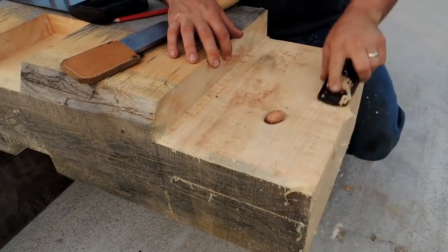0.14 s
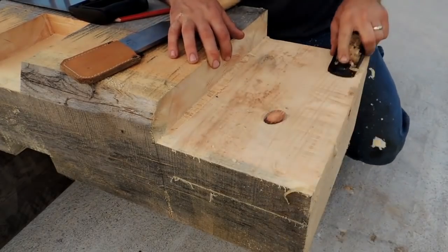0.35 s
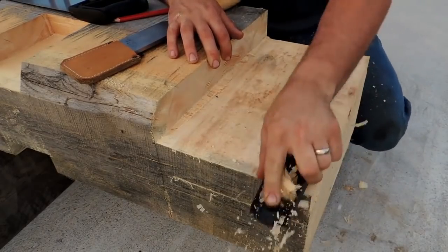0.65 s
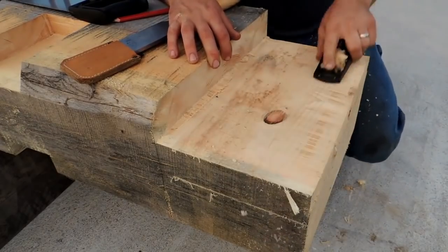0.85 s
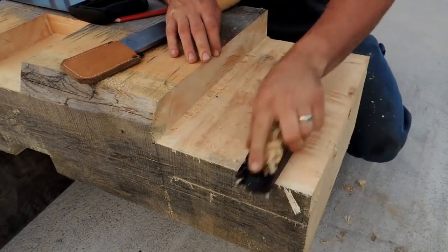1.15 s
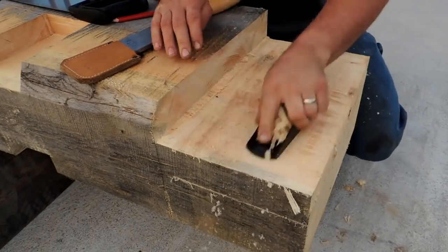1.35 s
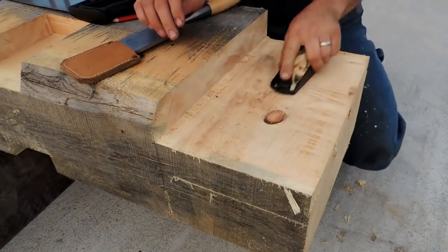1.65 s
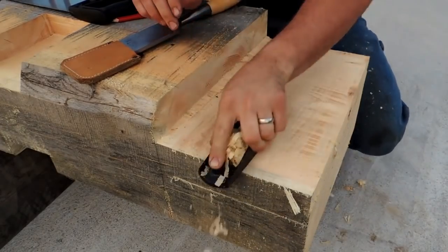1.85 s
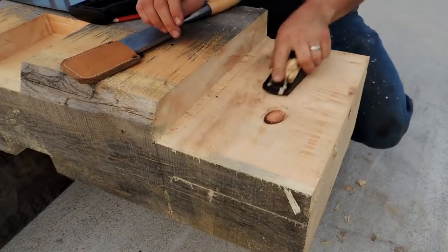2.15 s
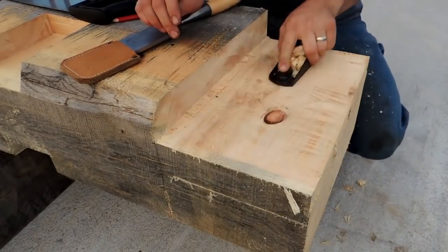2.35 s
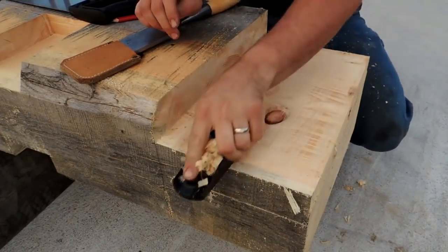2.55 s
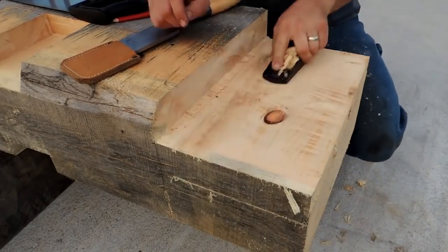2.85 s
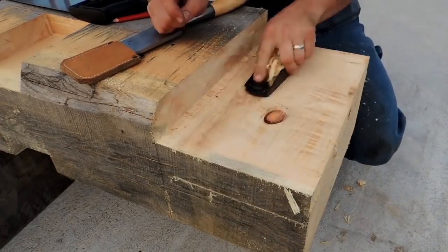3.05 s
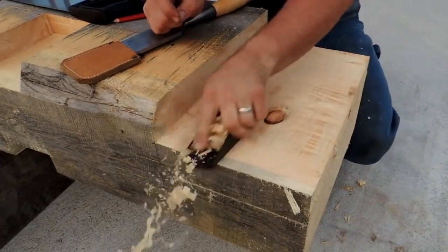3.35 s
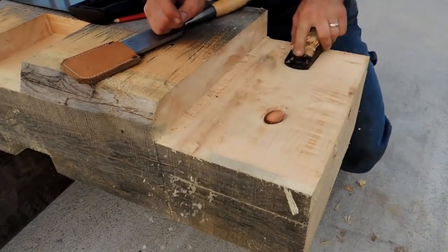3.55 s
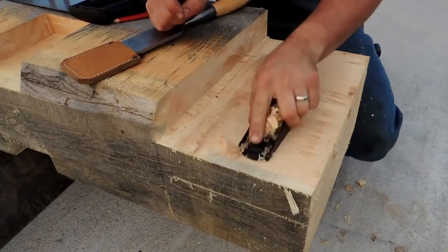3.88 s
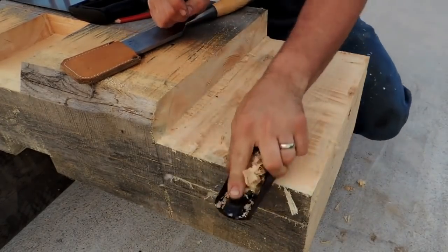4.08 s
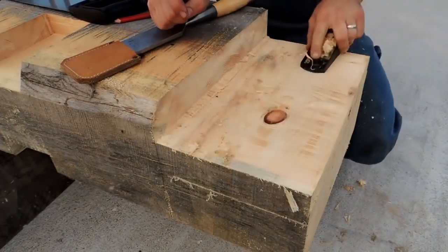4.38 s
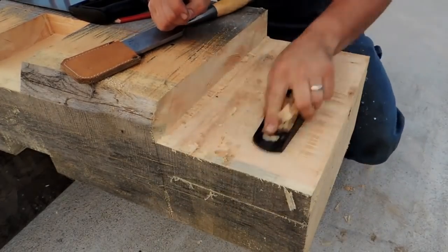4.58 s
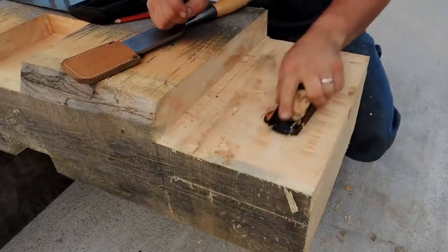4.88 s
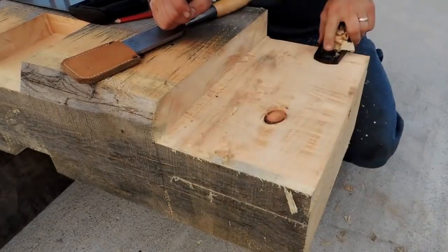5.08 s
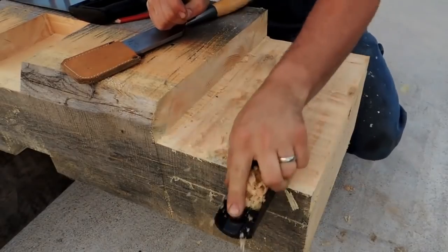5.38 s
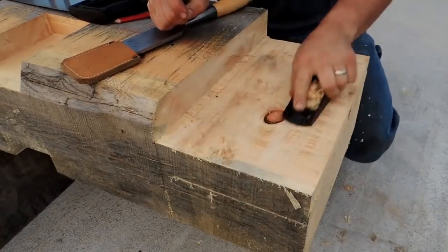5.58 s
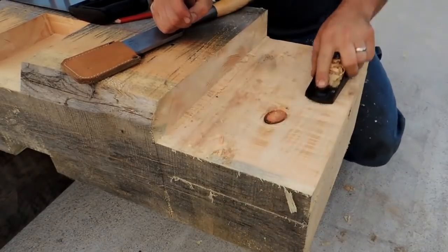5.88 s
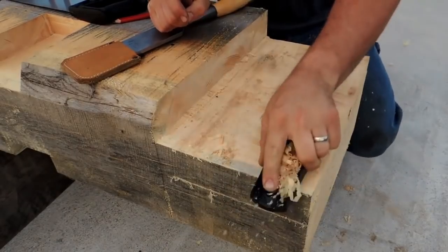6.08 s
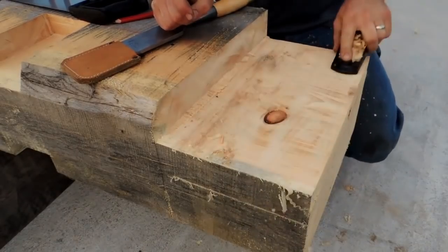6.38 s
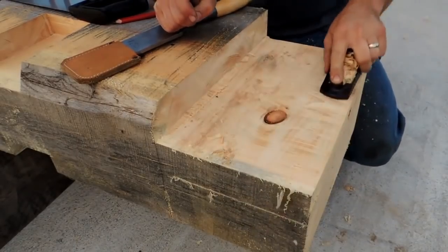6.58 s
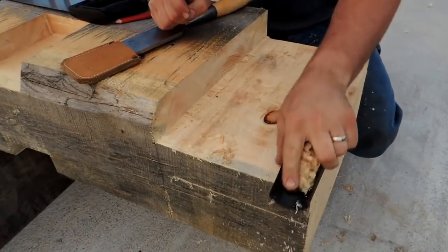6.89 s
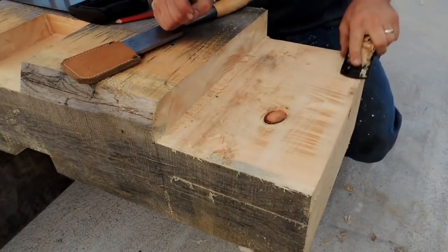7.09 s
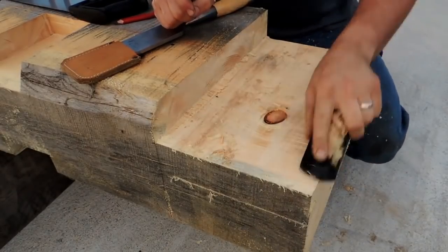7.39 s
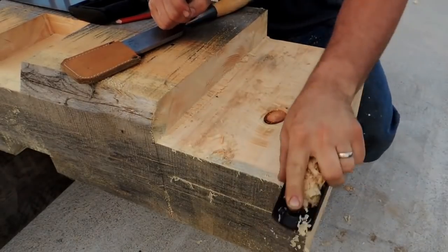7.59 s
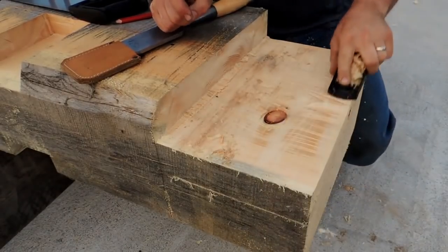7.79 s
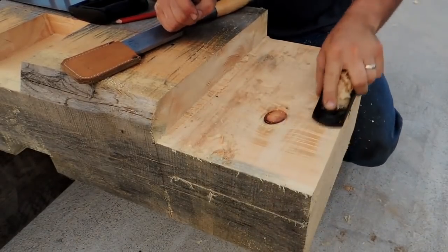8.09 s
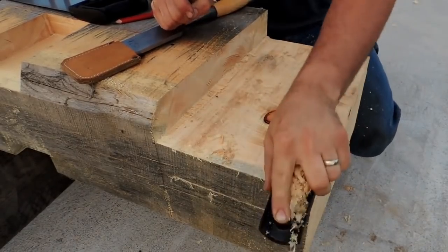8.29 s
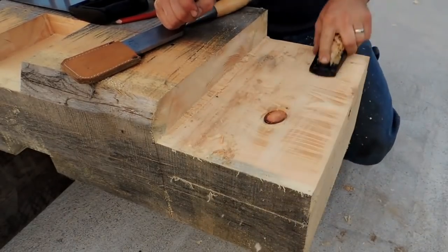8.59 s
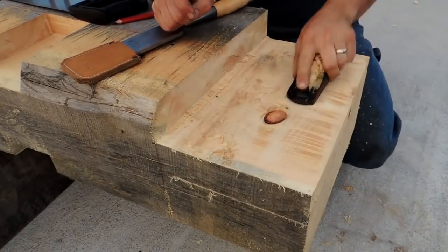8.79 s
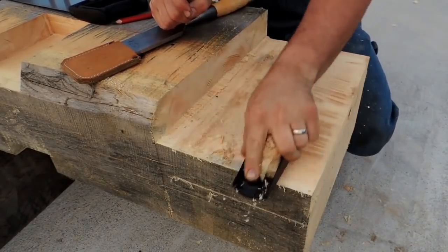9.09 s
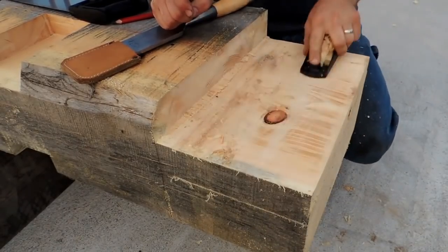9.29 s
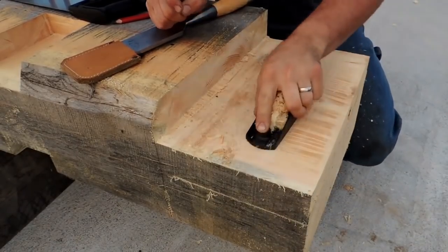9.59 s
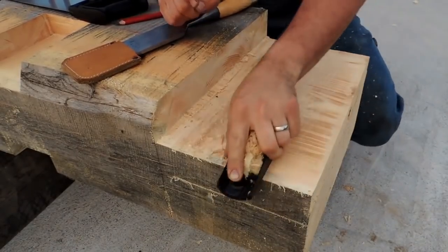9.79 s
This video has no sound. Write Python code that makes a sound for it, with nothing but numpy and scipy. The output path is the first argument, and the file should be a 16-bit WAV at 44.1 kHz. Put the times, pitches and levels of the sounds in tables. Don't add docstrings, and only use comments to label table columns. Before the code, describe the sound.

A small block plane rasps back and forth over a heavy timber in quick scraping strokes, with wooden knocks and soft low wind thumps.

```python
import sys
import numpy as np
from scipy import signal
from scipy.fft import rfft, irfft, next_fast_len
from scipy.io import wavfile
from scipy.ndimage import uniform_filter1d, map_coordinates

SR = 44100
rng = np.random.default_rng(int(sys.argv[2]) if len(sys.argv) > 2 else 0)


def dump(signal):
    limited = np.clip(np.atleast_2d(signal).T, -1, 1)
    pcm = np.round(limited * 32767).astype(np.int16)
    wavfile.write(sys.argv[1], SR, pcm)


def nominal_scale(level):
    x = np.asarray(level, float) / 20
    return 10 ** x


N = 438354


def unit(x):
    return x / np.sqrt(np.mean(x ** 2) + 1e-20)


def curves(rows):
    s, *columns = np.transpose(rows)
    s = np.maximum.accumulate(s)
    return [np.interp(np.arange(N) / SR, s, column) for column in columns]


def wobble(rate):
    knots = rng.standard_normal(int(N * rate / SR) + 4)
    return map_coordinates(knots, [np.arange(N) * rate / SR])


def filtered(x, response):
    m = next_fast_len(N + SR // 2)
    spectrum = rfft(x, m) * response(np.fft.rfftfreq(m, 1 / SR))
    return irfft(spectrum, m)[:N]


def coloured(x, points):
    hz, db = np.transpose(points)
    return filtered(x, lambda f: nominal_scale(np.interp(np.log(f + 1), np.log(hz), db)))


def ringing(force, modes, shift_db, steep):
    total = np.zeros(N)
    for k, (hz, width, db) in enumerate(modes):
        b, a = signal.iirpeak(hz, hz / width, SR)
        drive = force * nominal_scale(shift_db * wobble(9))
        total += (-1) ** k * nominal_scale(db) * signal.lfilter(b, a, drive)
    top = modes[-1][0] * 1.177
    return filtered(total, lambda f: 1 / (1 + 1j * f / top) ** steep) * nominal_scale(2.97 * steep)


def patchy(x, depth_db):
    z = signal.stft(x, nperseg=512)[2]
    field = uniform_filter1d(rng.standard_normal(z.shape), 3, 0)
    field = uniform_filter1d(field, 14, 1)
    return signal.istft(z * nominal_scale(depth_db * unit(field)), nperseg=512)[1][:N]


def tearing(per_second, spread_db, rub):
    sizes = nominal_scale(spread_db * np.clip(rng.standard_normal(N), -2, 2))
    snaps = (rng.random(N) < per_second / SR) * sizes
    snaps = unit(snaps * rng.choice([-1, 1], N))
    return unit(snaps + rub * rng.standard_normal(N))


def yard():
    # (frequency [Hz], density [dB per Hz])
    yard_spectrum = [(88, -41), (150, 2), (341, 9.5), (457, -18.5), (1140, -2.5), (1260, -22.5),
                     (7470, -13), (16000, -20)]
    return nominal_scale(-70) * unit(coloured(rng.standard_normal(N), yard_spectrum))


def wind():
    # (time [s], level [dB])
    breeze_levels = [(0.0, -75), (0.33, -74), (0.58, -79), (0.8, -69), (0.97, -75), (1.55, -61),
                     (1.71, -70.5), (2.96, -80), (3.07, -67), (3.21, -42), (3.35, -58), (3.63, -63),
                     (3.84, -58), (3.98, -60), (4.4, -57.5), (4.76, -48), (5.04, -38), (5.26, -62),
                     (5.48, -64), (5.67, -54), (5.98, -58), (6.12, -48), (6.2, -44), (6.37, -66),
                     (7.5, -68.5), (7.61, -43), (7.75, -40.5), (7.8, -41), (7.94, -47.5), (8.22, -52),
                     (8.39, -38), (8.5, -45), (8.61, -46), (8.72, -58), (9.08, -47), (9.3, -67),
                     (9.66, -53.5), (9.94, -70)]
    # (time [s], level [dB], length [ms], signed direction [ratio])
    puff_events = [(1.448, -22, 3.7, 1), (1.46, -28, 1.1, 0.61), (1.468, -17, 1, -1.4),
                   (2.241, -18, 0.96, 1), (3.095, -26, 2.8, 0.81), (3.121, -16.5, 1.2, 0.65),
                   (3.462, -31, 0.7, 1), (4.528, -29, 1.7, 1), (4.537, -18, 2, 1),
                   (4.779, -16.5, 2.6, 0.79), (4.923, -16, 6.1, -1), (4.934, -15.5, 4, 0.65),
                   (4.955, -17.5, 4, 1), (5.142, -17.5, 1.4, 1), (5.551, -32, 2.5, 0.89),
                   (6.169, -37, 3.4, 1), (7.639, -21, 2.3, -1), (7.648, -13, 3.6, 0.94),
                   (7.788, -30, 2.4, 1), (7.851, -19, 1.4, 0.92), (7.868, -24, 3, 0.61),
                   (8.391, -24.5, 2.7, 1), (8.67, -30, 4.3, 0.77), (9.232, -39, 4.4, 0.77),
                   (9.472, -29.5, 5, 0.9)]
    push = np.zeros(N + SR)
    t = np.arange(SR // 20) / SR
    for s, db, ms, way in puff_events:
        u = t / (ms / 1000)
        push[round(s * SR):][:len(t)] += way * nominal_scale(db + 17) * u ** 1.74 * np.exp(-u * 1.52)

    def bass(f):
        return -f * f / (54 ** 2 - f * f + 1j * f * 22)

    lumps = nominal_scale(5 * wobble(15)) * rng.standard_normal(N)
    breeze = unit(filtered(lumps, lambda f: bass(f) / (1 + (f / 60) ** 1.66)))
    return filtered(push[:N], bass) + nominal_scale(curves(breeze_levels)[0] + 6) * breeze


def rasps():
    # (time [s], level [dB], half-length [s])
    rasp_events = [
        (0.729, -27, 0.0093),
        (1.349, -32, 0.015),
        (1.904, -60.5, .012),
        (4.173, -39, .016),
        (4.835, -31, 0.0066),
        (5.519, -32.5, 0.0097),
        (7.619, -36, .012),
        (7.805, -38, 0.01),
        (9.117, -33.5, .012),
    ]
    # (frequency [Hz], density [dB per Hz])
    splinter_spectrum = [(3000, -40), (4200, -4), (5200, 4), (7000, -3), (9000, -25), (15000, -27.5)]
    t = np.arange(N) / SR
    swell = sum(nominal_scale(db) * np.exp(-((t - s) / length) ** 4) for s, db, length in rasp_events)
    return swell * unit(coloured(tearing(per_second=4400, spread_db=5, rub=1.2), splinter_spectrum))


def plane():
    # (time [s], timber [dB], iron body [dB], blade [dB], shaving hiss [dB])
    early_strokes = [
        [(0.0, -30, -29.5, -41, -48), (0.114, -28, -29.5, -36.5, -41.5), (0.146, -46, -70, -63, -74),
         (0.174, -58, -63, -70, -70.5), (0.216, -27, -34, -50, -53), (0.36, -24, -22.5, -29, -33.5),
         (0.462, -49, -59, -67, -74), (0.494, -36, -33.5, -60, -57), (0.546, -36, -26, -35, -43),
         (0.74, -29.5, -29.5, -36.5, -40), (0.758, -49, -58, -60, -65), (0.848, -66, -68, -73, -70.5),
         (0.86, -34, -33, -44, -40)],
        [(0.86, -26, -31.5, -38.5, -48.5), (1.016, -23, -26, -36, -39.5), (1.066, -30.5, -32.5, -41, -53),
         (1.106, -39.5, -51, -71, -73.5), (1.192, -38.5, -28.5, -34.5, -41), (1.312, -41.5, -41.5, -43, -43),
         (1.352, -35.5, -27.5, -39.5, -47.5), (1.416, -59, -79, -67, -73), (1.474, -47, -66, -69, -69),
         (1.488, -56, -58, -55, -57)],
        [(1.488, -44, -42, -40, -48.5), (1.526, -34.5, -43, -55, -54.5), (1.552, -34, -35, -57, -57),
         (1.558, -35, -36, -46, -42.5)],
        [(1.558, -34.5, -34, -45, -40), (1.668, -40, -44, -48.5, -59.5), (1.72, -70, -76, -76, -83),
         (1.768, -65, -58, -77, -79), (1.804, -58, -47, -55, -60), (1.872, -51, -47, -59, -59),
         (1.884, -47, -40, -49, -35)],
        [(1.884, -52, -33, -47, -23.5), (1.936, -37, -33.5, -48.5, -50.5), (2.038, -44.5, -49.5, -63.5, -57),
         (2.07, -69.5, -73.5, -89, -75.5), (2.166, -77.5, -84, -88, -86), (2.22, -43, -57, -90, -65),
         (2.258, -45.5, -40.5, -57, -44), (2.378, -37, -43, -57, -56), (2.426, -62, -74, -84, -87),
         (2.53, -45.5, -44, -57, -59.5), (2.602, -50, -48, -66, -57), (2.618, -37.5, -39, -52, -48)],
        [(2.618, -42.5, -32.5, -50, -51.5), (2.712, -29, -28.5, -37, -42), (2.73, -46, -52, -59, -64),
         (2.776, -62, -68, -69, -69), (2.846, -72, -75, -78, -80), (2.858, -53, -55, -48, -55)],
        [(2.858, -41, -45, -59, -59), (2.906, -34.5, -35, -52, -43), (3.03, -54, -50, -88, -69),
         (3.102, -63, -66, -86, -81), (3.21, -39.5, -38.5, -77, -60), (3.256, -42, -38.5, -54, -49.5),
         (3.36, -33.5, -24.5, -49, -53), (3.372, -46, -49, -65, -61), (3.448, -73, -76, -77, -75),
         (3.456, -32, -50, -86, -84)],
        [(3.456, -35, -59, -86, -75), (3.486, -31.5, -74, -85, -69), (3.52, -49, -62, -86, -69),
         (3.527, -39, -40, -62, -53)],
        [(3.527, -36, -36, -67, -52), (3.727, -54.5, -52.5, -62, -71.5), (3.781, -58, -71, -81, -87),
         (3.863, -46.5, -40.5, -50, -58), (3.927, -45, -47, -56, -56.5), (3.971, -36, -25, -27.5, -31),
         (4.031, -42, -42, -51, -57.5), (4.127, -34.5, -40, -60, -49), (4.173, -26.5, -34, -49, -47.5),
         (4.211, -50, -61, -65, -64), (4.311, -74, -88, -86, -90), (4.327, -62, -57, -44, -54)],
        [(4.327, -49.5, -51, -64, -61), (4.381, -36, -43, -55, -43.5), (4.439, -55, -52, -66, -61),
         (4.615, -49, -58, -67, -69.5), (4.689, -36, -38, -44, -51.5), (4.769, -47, -43.5, -69, -53.5),
         (4.827, -30, -31, -33.5, -44.5), (4.893, -65, -65, -77, -68), (4.919, -42, -77, -69, -69),
         (4.973, -65, -76, -77, -64), (4.99, -58, -58, -57, -60)],
    ]
    # (time [s], timber [dB], iron body [dB], blade [dB], shaving hiss [dB])
    late_strokes = [
        [(4.99, -52, -43, -47, -46), (5.014, -30.5, -42.5, -66, -50), (5.16, -36.5, -39.5, -38.5, -44.5),
         (5.214, -41, -36.5, -52, -63), (5.248, -51, -57, -73, -76), (5.348, -38.5, -33.5, -41.5, -45),
         (5.528, -37, -32.5, -46.5, -46), (5.542, -48, -56, -59, -65), (5.654, -75, -80, -85, -82),
         (5.666, -29, -47, -58, -57)],
        [(5.666, -43, -39.5, -45, -47), (5.74, -27.5, -35.5, -60, -50), (5.836, -29, -30.5, -39.5, -45.5),
         (5.958, -47.5, -44, -68, -72), (6.024, -36, -31, -41.5, -43), (6.222, -25, -28, -35.5, -38.5),
         (6.278, -50.5, -68, -67, -72), (6.398, -43, -51, -74, -58), (6.416, -34.5, -41, -58, -52),
         (6.462, -59, -64, -68, -65), (6.492, -36, -32, -40, -46)],
        [(6.492, -30, -38, -44, -48), (6.512, -25.5, -21.5, -28.5, -33), (6.592, -31, -33, -44.5, -55),
         (6.628, -34.5, -56, -64, -69), (6.676, -36, -28.5, -58, -58), (6.738, -31.5, -22, -32.5, -36),
         (6.938, -31, -34, -39.5, -45), (6.998, -56, -76, -78, -77), (7.066, -61, -67, -72, -64)],
        [(7.066, -47, -59, -59, -59), (7.07, -44, -50, -51, -54), (7.086, -49, -71, -76, -71),
         (7.098, -40, -51, -61, -59)],
        [(7.098, -28, -51, -59, -59), (7.1, -27.5, -40, -56, -53), (7.228, -27.5, -28.5, -34.5, -48),
         (7.312, -41, -42, -57, -68), (7.36, -68, -81, -76, -81), (7.388, -44, -37, -62, -58)],
        [(7.388, -33, -29.5, -60, -58), (7.45, -28.5, -26, -35, -41), (7.55, -28, -32.5, -44.5, -50),
         (7.624, -27.5, -32, -40, -45.5), (7.698, -74, -83, -75, -77), (7.782, -70, -73, -81, -65),
         (7.796, -41, -45, -57, -62)],
        [(7.796, -41, -53, -54, -59), (7.806, -31, -33.5, -48.5, -44.5), (7.864, -24.5, -31.5, -39, -45.5),
         (8.056, -29.5, -30, -41.5, -57.5), (8.1, -47, -71, -70, -74), (8.12, -46, -36, -56, -55)],
        [(8.12, -32, -29, -62, -64), (8.186, -26, -20.5, -31, -40), (8.4, -26.5, -29, -33.5, -39.5),
         (8.414, -40, -53, -60, -58), (8.474, -67, -74, -72, -74), (8.544, -70, -74, -76, -67),
         (8.554, -30, -57, -61, -55)],
        [(8.554, -29, -44, -55, -49), (8.602, -27.5, -30, -41, -42), (8.74, -28.5, -32.5, -37, -45.5),
         (8.816, -45, -45.5, -56, -70), (8.852, -55, -71, -69, -72), (8.868, -41, -38, -60, -58)],
        [(8.868, -35, -34, -59, -63), (8.918, -34.5, -35.5, -39, -46.5), (9.056, -30.5, -33, -41, -44),
         (9.124, -27.5, -30.5, -39, -41), (9.146, -47, -52, -58, -64), (9.262, -72, -81, -77, -81),
         (9.274, -25, -40, -50, -46)],
        [(9.274, -29.5, -35.5, -39.5, -44.5), (9.318, -28.5, -37.5, -54, -48.5), (9.442, -38, -38, -39.5, -53),
         (9.496, -30.5, -43.5, -58, -64), (9.53, -57, -74, -71, -81), (9.568, -54, -54, -77, -80),
         (9.642, -50, -41, -50, -62)],
        [(9.642, -39, -41, -55, -56), (9.646, -38, -33.5, -48, -57), (9.732, -36.5, -36.5, -40, -37.5),
         (9.796, -53, -44.5, -69, -60), (9.908, -45, -48, -63, -61), (9.94, -36, -34, -51, -47)],
    ]
    # (frequency [Hz], width [Hz], level [dB])
    timber_modes = [(205, 49, -23), (316.7, 46, -14), (443.3, 109, 2.5), (545, 153, 4.5), (651, 104, 5),
                    (861, 142, 3.5), (1019, 160, -11)]
    # (frequency [Hz], width [Hz], level [dB])
    iron_modes = [(1163, 187, -6), (1454, 180, -3), (1845, 223, -1), (2237, 202, -1.5), (2693, 307, -8.5)]
    # (frequency [Hz], width [Hz], level [dB])
    blade_modes = [(2872, 327, -2), (3890, 450, -3), (4270, 550, -5), (5300, 590, -10.5)]
    # (frequency [Hz], density [dB per Hz])
    hiss_spectrum = [(3530, -39), (6000, -2.5), (7970, 3), (8500, -0.5), (9330, -1), (11500, -10.5),
                     (15100, -5.5), (15800, -26.5)]
    # (time [s], level [dB])
    sole_knocks = [(1.427, -28), (1.56, -10), (3.459, -15.5), (3.479, -33), (3.488, -26), (3.505, -38),
                   (4.538, -27), (4.915, -25), (5.14, -26), (8.147, -20), (8.166, -10), (9.276, -32)]
    timber_db, iron_db, blade_db, hiss_db = curves(np.vstack(early_strokes + late_strokes))
    chatter = 1.63 * wobble(45) + 1.26 * wobble(140)
    cut = tearing(per_second=1200, spread_db=6, rub=1.28)
    fizz = tearing(per_second=3400, spread_db=3, rub=1.4)
    blows = np.zeros(N)
    for s, db in sole_knocks:
        blows[round(s * SR)] = nominal_scale(db + 23.5)
    blows = signal.lfilter([0.15], [1, -0.85], blows)

    timber_force = cut * nominal_scale(timber_db + 11 + chatter) + blows
    iron_force = cut * nominal_scale(iron_db + 10.5 + chatter) + 0.16 * blows
    blade_force = cut * nominal_scale(blade_db + 11 + chatter)
    timber = ringing(timber_force, timber_modes, shift_db=3.5, steep=1.83)
    iron = ringing(iron_force, iron_modes, shift_db=2.5, steep=3.43)
    blade = ringing(blade_force, blade_modes, shift_db=2.0, steep=2.72)
    shaving = coloured(fizz * nominal_scale(hiss_db + 5.5 + 1.18 * chatter), hiss_spectrum)
    return patchy(timber + iron, 1.2) + patchy(blade + shaving, 3.76)


def scene():
    return (yard() + wind() + rasps() + plane())[None]


def top_cut(x):
    return signal.sosfilt(signal.butter(12, 16680, fs=SR, output="sos"), x)


def record(dry):
    return top_cut(dry)


dry = scene()
out = record(dry)
dump(out)
```